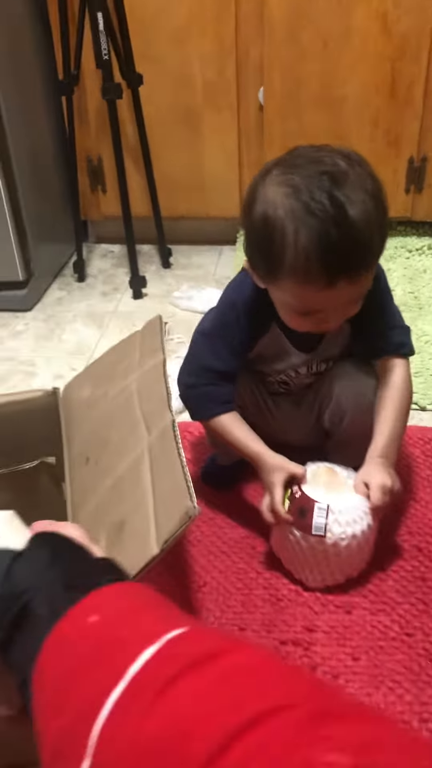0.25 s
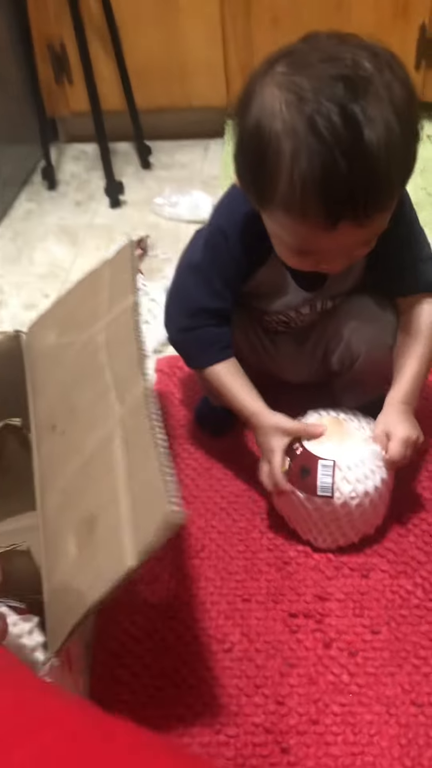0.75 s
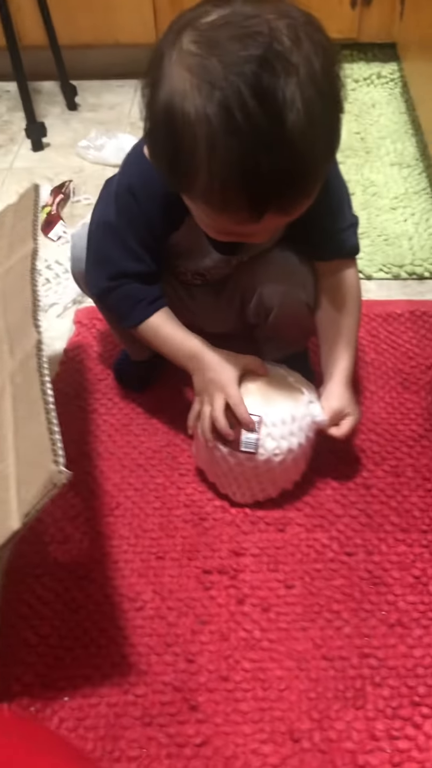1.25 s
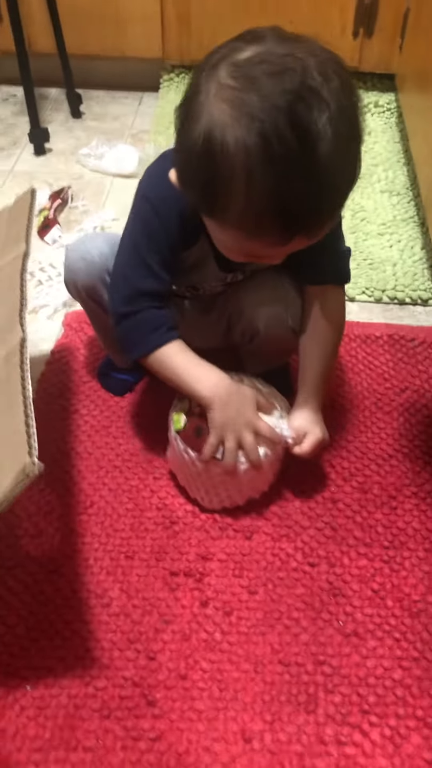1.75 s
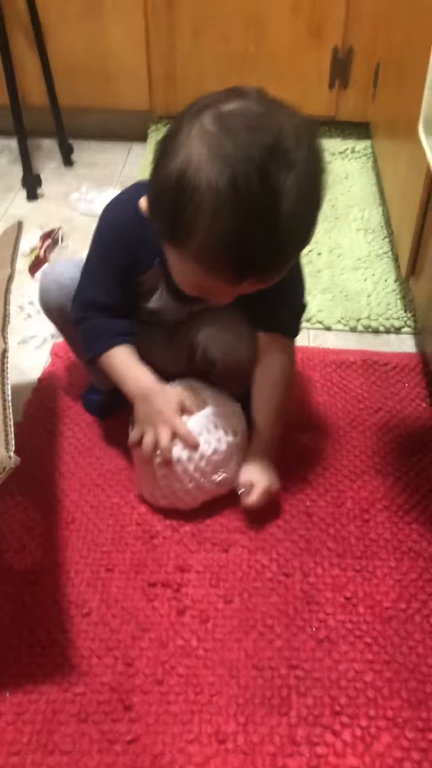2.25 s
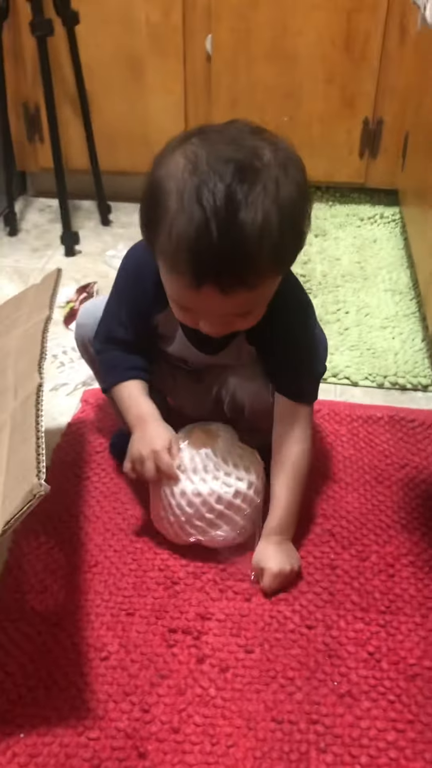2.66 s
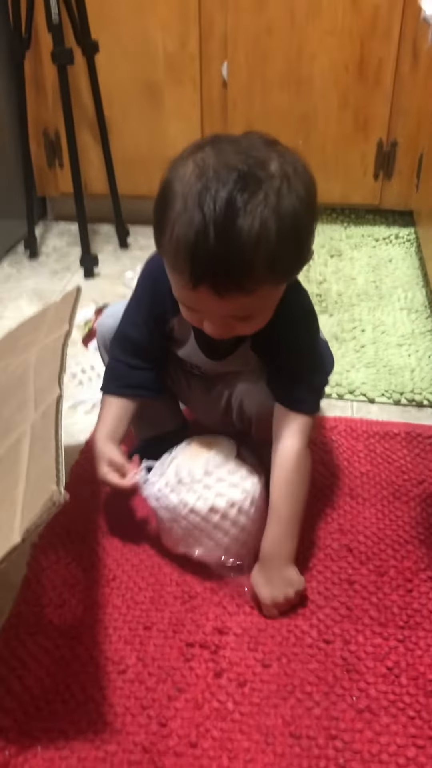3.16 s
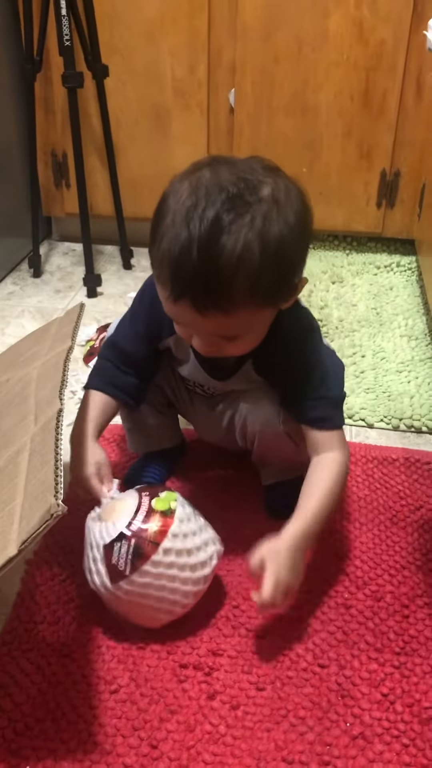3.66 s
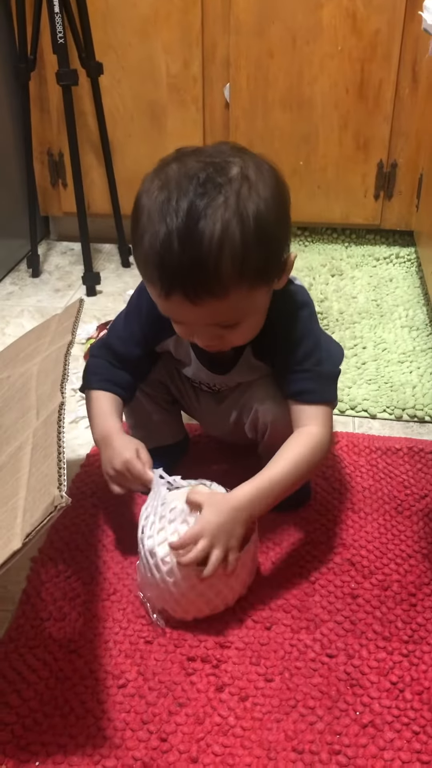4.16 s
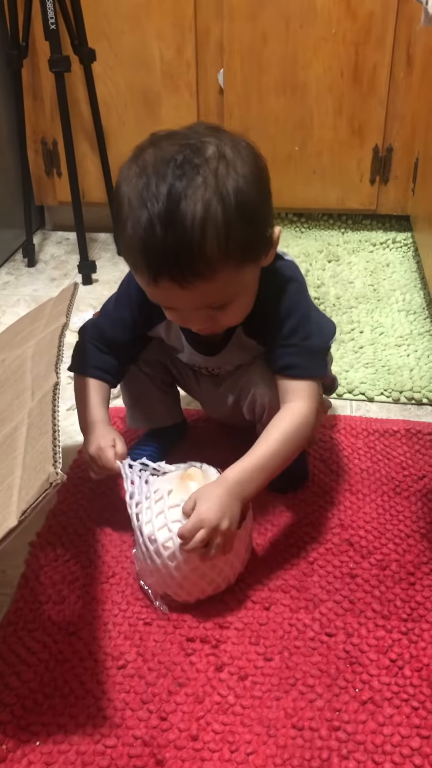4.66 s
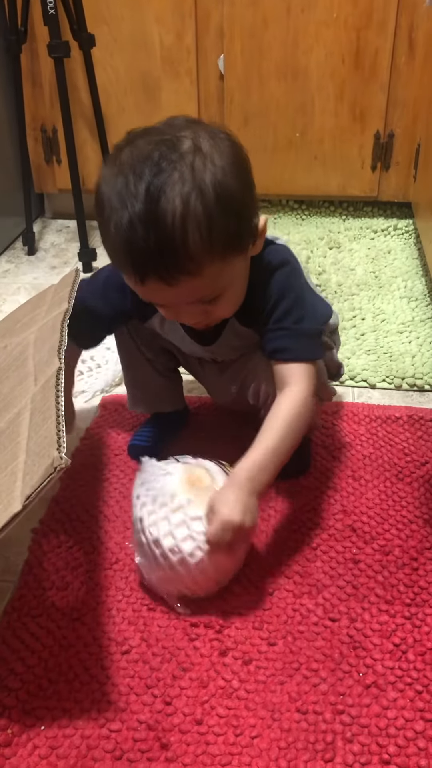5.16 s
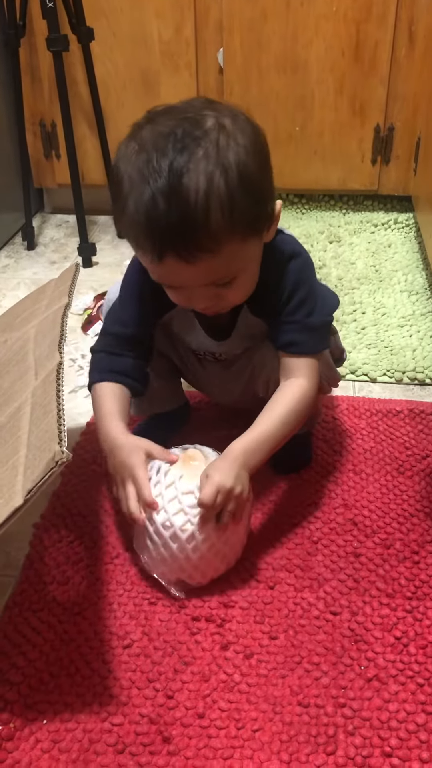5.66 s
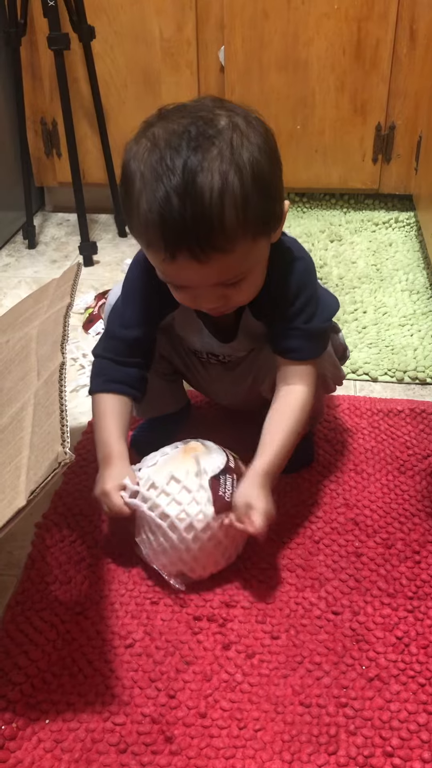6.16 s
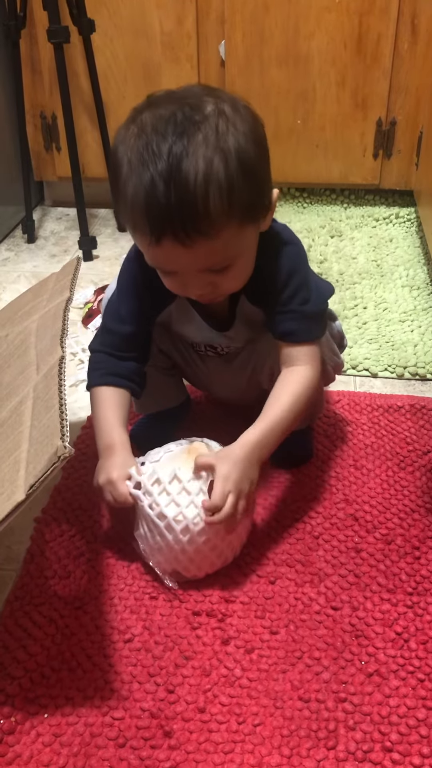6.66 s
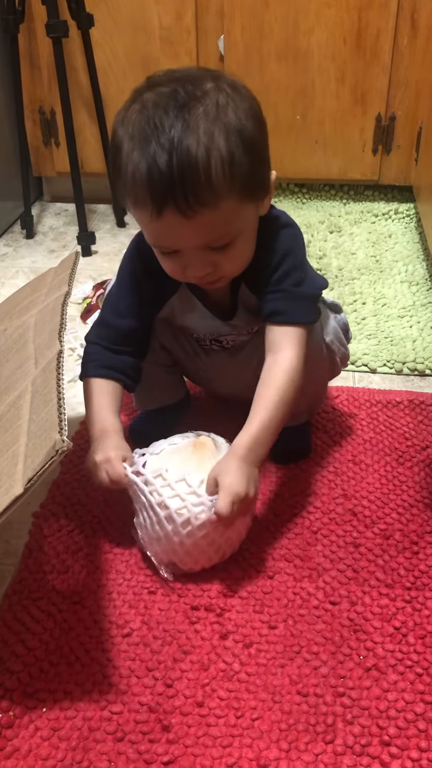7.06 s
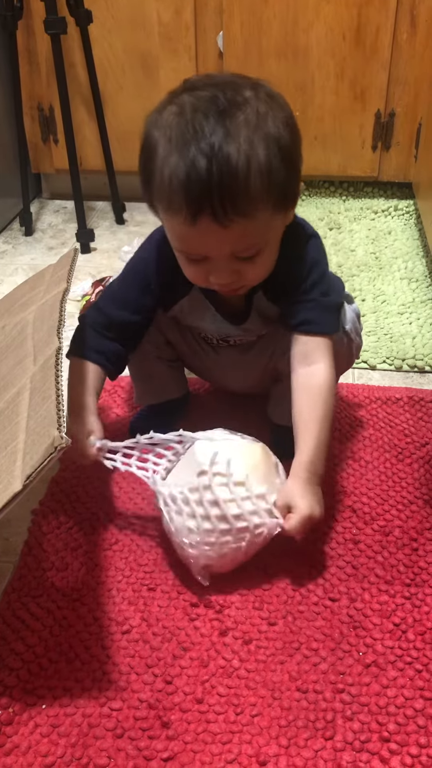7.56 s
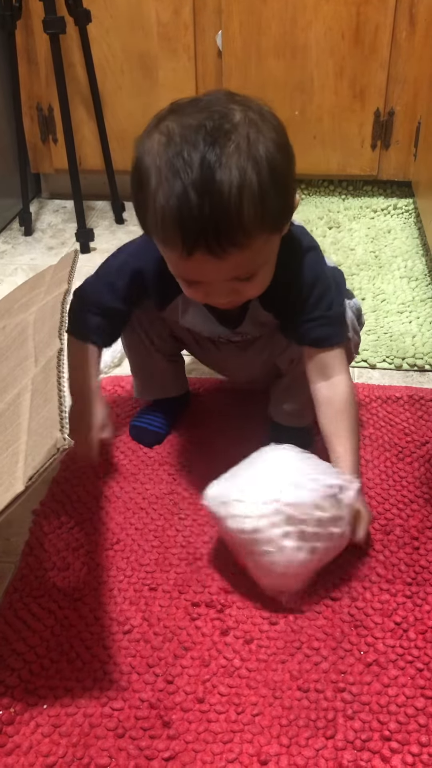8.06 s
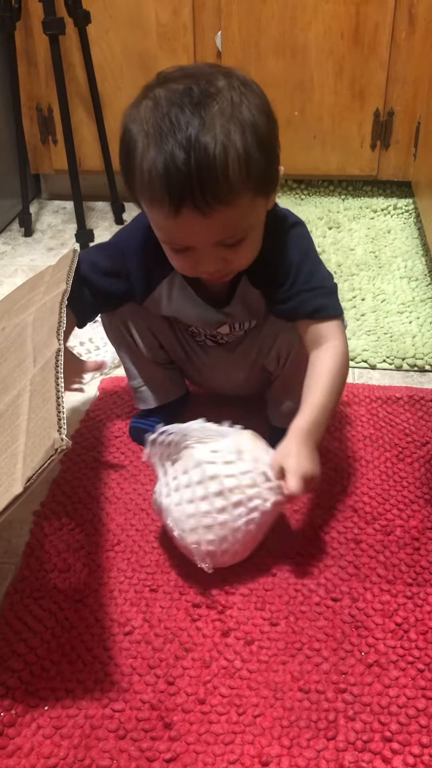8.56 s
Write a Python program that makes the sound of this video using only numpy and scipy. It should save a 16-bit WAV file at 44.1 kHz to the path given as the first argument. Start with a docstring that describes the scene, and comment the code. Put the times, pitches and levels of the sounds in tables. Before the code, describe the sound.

Small hands pull at a stretchy foam sleeve on a big fruit resting on a rug. Irregular dry snaps, light rustles and dull bumps come in clusters, with a long soft creaky crackle midway. Late on, several very loud tearing pops burst out, then only faint ticks remain. Close handheld microphone in a small, lightly reflective kitchen with quiet fridge hum and air hiss.

```python
"""On a kitchen rug, small hands pull at the foam mesh sleeve around a large fruit.
Strands snap as noise tears that ring resonators, crack in the treble and knock the fruit's modes; some creak.
Low thuds are noise through a low resonance, with a scuff; rubbed foam rustles in clumped ticks over coloured hiss.
A fridge hums as sine lines in coloured air noise, and decaying noise bands give the room's reflections."""
import sys
import numpy as np
from scipy import signal
from scipy.fft import rfft, irfft
from scipy.io import wavfile

SR = 44100
rng = np.random.default_rng(int(sys.argv[2]) if len(sys.argv) > 2 else 0)


def int16_out(signal):
    """Quantize to a 16-bit WAV file."""
    q = np.round(np.clip(np.atleast_2d(signal).T, -1, 1) * 32767)
    wavfile.write(sys.argv[1], SR, q.astype(np.int16))


N = 388080  # length in samples

# room air colour: f/Hz, relative density level/dB per Hz
AIR_SPECTRUM = [(15, -33.5), (25, -3), (64, 8), (309, 2.5), (354, -1), (416, -2.5), (887, -7.5),
                (1290, -12.5), (2990, -16), (5570, -18), (14800, -26.5), (16000, -40)]
AIR_DB = -67  # rms level around which the air drifts
# fridge motor lines: f/Hz, mean rms level/dB
FRIDGE_LINES = [(118.4, -83), (360.7, -78)]
# decay of the room's reflections: f/Hz, t60/s
ROOM_DECAY = [(100, 0.32), (300, 0.38), (1000, 0.2), (4000, 0.16), (12000, 0.068)]
ROOM_DB = -40  # gain on the reflections

# colour of the foam rustle: f/Hz, relative density level/dB per Hz
FOAM_SPECTRUM = [(600, -21), (1300, -19), (2050, -1.5), (2450, -3.5), (3300, -0.5), (4300, -6.5),
                 (5100, -3), (6500, -8), (9000, -11.5), (16000, -30)]
# where the mesh rings when rubbed or torn: f/Hz
SLEEVE_MODES = [1884, 2600, 3290, 3800, 4650, 6500, 8850]
# colour of the dull rubbing: f/Hz, relative density level/dB per Hz
DULL_RUB_SPECTRUM = [(65, -32), (110, -7), (345, -4), (422, -10), (668, -1), (1600, -13.5), (2080, -20.5),
                     (3520, -120)]
# each rub of foam on skin, fruit and rug: peak t/s, swell t/s, hold t/s,
# bright rustle level/dB, dull rub level/dB, treble level/dB relative to bright
RUB_STROKES = [(0.055, 0.017, 0.001, -54, -56.5, -3), (0.301, 0.022, .001, -57.5, -66, -3),
               (0.716, 0.012, .001, -43.5, -44.5, -15), (0.802, 0.017, .001, -51.5, -44, 0.5),
               (0.964, 0.025, 0.024, -58, -57, -2), (1.085, 0.027, .001, -51.5, -56.5, 6.5),
               (1.336, 0.021, .001, -68, -62.5, -8), (1.478, 0.11, 0.076, -58.5, -68.5, -5.5),
               (1.728, 0.037, 0.042, -58.5, -66, -1), (1.788, .03, 0.028, -64, -57, 4),
               (2.104, 0.2, .001, -46.5, -44, 6), (2.309, 0.1, 0.41, -63.5, -61, 3.5),
               (2.625, 0.32, 0.18, -61.5, -64, 7.5), (2.978, 0.17, 0.18, -59.5, -60, -2),
               (3.214, 0.045, 0.063, -60.5, -58.5, -1), (3.437, 0.044, 0.00084, -70, -74, 2),
               (3.891, 0.028, 0.013, -68.5, -77, -2), (4.14, 0.07, 0.36, -66, -76, -10),
               (4.61, 0.41, 0.25, -61, -70, 2.5), (4.914, 0.011, 0.04, -49.5, -48, 1),
               (5.05, 0.054, 0.022, -60.5, -89, 2.5), (5.787, 0.023, 0.038, -54.5, -65.5, -3),
               (6.004, 0.038, 0.034, -50, -54, 5.5), (6.082, 0.028, 0.044, -52.5, -57.5, -8),
               (6.408, 0.022, .001, -63.5, -80, -5), (6.73, 0.29, .001, -69.5, -72, 2),
               (7.069, 0.2, 0.024, -64, -64, 9.5), (7.217, 0.18, 0.025, -60.5, -63.5, 12),
               (7.332, 0.034, 0.091, -55, -41.5, 16), (7.43, 0.1, 0.00091, -38.5, -39, -11),
               (7.626, 0.0049, 0.00083, -63, -45.5, 15), (7.728, 0.016, 0.00091, -43.5, -36, 4.5),
               (7.824, 0.096, .001, -59, -54, -1), (7.972, .015, 0.011, -68, -64, 12),
               (8.121, .015, 0.029, -63.5, -67.5, 6), (8.427, 0.036, .001, -65, -76, -3)]
SWELL_DB, FADE_DB_PER_S, DULL_FADE_DB_PER_S = 27.5, 154, 175
# hands resting on the foam between rubs
REST_DB, REST_DULL_DB, REST_WANDER_DB = -79, -81, 3.5

# dull low thuds, some under loud snaps: t/s, peak level/dB before the common trim,
# resonance f/Hz, t60/s of the push, scuff level/dB relative to the push
LOW_THUDS = [(0.09, -43, 338, 0.18, -5), (0.159, -48.5, 73.4, 0.58, -4.5), (0.712, -28, 111, 0.31, -8),
             (0.73, -31.5, 102, 0.12, -9), (0.796, -18, 705, 0.048, -15.5), (0.975, -34, 180, 0.12, -11),
             (0.989, -30, 74, 0.14, -20), (1.913, -36, 284, 0.2, -1), (1.971, -34, 600, 0.063, 12),
             (2.008, -37.5, 221, 0.083, 3), (2.067, -26.5, 388, 0.055, 16), (2.103, -26, 185, 0.057, 6),
             (2.45, -43, 109, 0.25, -11), (2.485, -26.5, 89, 0.16, -1), (2.507, -31, 132, 0.19, -11),
             (3.202, -41, 613, 0.18, -7), (3.431, -46.5, 510, 0.056, -6), (3.9, -54, 90, 0.098, -3),
             (4.154, -44.5, 460, 0.18, -3), (4.912, -23.5, 294, 0.059, -0.5),
             (4.949, -21.5, 305, 0.048, -4.5), (6.005, -31, 248, 0.12, 0.5), (6.081, -29.5, 202, 0.17, 0),
             (6.434, -52.5, 80, 0.071, -21), (6.704, -41.5, 660, 0.1, -11), (7.299, -30.5, 613, 0.096, 1),
             (7.715, -16, 310, 0.06, 5), (7.784, -21, 420, 0.071, -7.5), (7.81, -24, 133, 0.21, 3),
             (7.832, -30.5, 302, 0.15, -4)]

# strands under steady pull, slip after slip: start t/s, end t/s, typical gap t/s,
# central ring peak level/dB, central ring f/Hz, central crack peak level/dB (levels before the common trims)
STRAND_CREAKS = [(1.955, 2.14, .014, -50, 3640, -45.5), (2.43, 2.83, 0.009, -52.5, 3900, -54),
                 (2.97, 3.32, .013, -55, 3340, -54), (4.629, 4.897, .0055, -47.5, 3550, -54.5),
                 (5.784, 5.881, .014, -60, 3340, -56.5), (7.04, 7.26, .016, -51, 3368, -51)]
# random spreads: log gap, shared level, extra crack level, fraction of the pitch
SLIP_GAP_SPREAD, SLIP_SPREAD_DB, SLIP_CRACK_SPREAD_DB, SLIP_PITCH_SPREAD = 0.4, 3, 4, 0.13
# strands slipping and breaking: t/s, ring peak level/dB, ring f/Hz, crack peak level/dB (before the common trims)
STRAND_SNAPS = [(0.057, -28, 3800, -40), (0.297, -40, 3300, -44.5), (0.7145, -32.5, 3150, -53),
                (0.769, -18.5, 3300, -34), (0.7965, -36, 1770, -41.5), (0.812, -37, 5060, -47),
                (0.9648, -38.5, 2200, -42), (0.99, -41.5, 3420, -45.5), (1.0481, -27.5, 4100, -32.5),
                (1.0821, -27.5, 3620, -30.5), (1.095, -33.5, 3470, -53), (1.117, -35, 3200, -41),
                (1.341, -32, 3600, -48), (1.3545, -43, 3470, -53.1), (1.4786, -59, 3520, -54),
                (1.4995, -46, 4740, -57), (1.972, -37, 3120, -42), (2.0093, -26.5, 3500, -41),
                (2.0337, -30, 4220, -38), (2.0386, -19.5, 3230, -33), (2.066, -26, 3750, -31),
                (2.068, -31, 2600, -27), (2.072, -34, 2200, -31), (2.1013, -37, 4200, -32),
                (2.1031, -28, 2900, -28), (2.1072, -35, 4400, -27), (2.1093, -34, 4530, -25),
                (2.1205, -32.5, 3900, -37), (2.1245, -34.5, 2580, -32), (2.2878, -41, 3670, -53),
                (2.5154, -27, 5340, -32), (2.606, -32.5, 4120, -43), (2.669, -31, 3800, -43),
                (2.694, -40, 3930, -45), (2.9224, -37.5, 3200, -41.5), (2.9765, -39, 4080, -42),
                (3.0958, -37, 4070, -43), (3.1428, -47, 3340, -45.5), (3.2005, -31.5, 2760, -34.5),
                (3.2042, -28.5, 3720, -35), (3.2135, -32.5, 3180, -40), (3.273, -38, 3050, -40.5),
                (3.431, -54.5, 2930, -50), (3.8994, -38.5, 2800, -53), (3.9778, -48, 3300, -50),
                (4.128, -48, 4420, -48), (4.161, -45, 2860, -44), (4.2284, -36, 3100, -48),
                (4.348, -42.5, 3300, -54), (4.4068, -49, 3000, -51), (4.424, -47, 3220, -53),
                (4.4434, -42, 3450, -51), (4.4888, -53, 4240, -50), (4.5154, -44, 3170, -50),
                (4.5543, -37.5, 2950, -44), (4.582, -31.5, 3060, -45), (4.597, -30, 3200, -49),
                (4.61, -29, 3250, -47), (4.6182, -32.5, 3370, -58), (4.6283, -38, 3480, -62),
                (4.639, -42, 3300, -54), (4.6596, -35, 3470, -44), (4.6815, -44, 3800, -51),
                (4.691, -40, 3500, -50), (4.6997, -37, 3680, -50), (4.7099, -48, 3500, -50),
                (4.7248, -41, 3300, -49), (4.7403, -37, 2900, -50), (4.7524, -45, 3500, -48),
                (4.7655, -44, 3800, -38), (4.7798, -36, 2930, -44), (4.792, -41, 3300, -52),
                (4.8076, -35, 3460, -40), (4.8197, -36, 3350, -44), (4.829, -34, 3300, -47),
                (4.8361, -37, 3290, -44), (4.844, -35, 3000, -47), (4.868, -43, 3300, -50),
                (4.8901, -42, 3190, -50), (4.9137, -34, 1500, -40), (4.951, -25, 3010, -32.5),
                (4.9553, -23.5, 2940, -42), (5.0402, -38.5, 3400, -64), (5.0559, -30, 3800, -36.5),
                (5.2985, -49, 2800, -59), (5.608, -48, 3280, -55), (5.817, -35, 5100, -44.5),
                (5.8417, -47, 3600, -59), (5.8524, -30.5, 3260, -50), (5.8692, -41.5, 3200, -51),
                (5.952, -41, 3400, -53), (5.973, -37.5, 3700, -51), (6.0049, -29, 3040, -27.5),
                (6.0078, -24.5, 4020, -29.5), (6.044, -29, 2870, -37), (6.0789, -19, 3030, -33.5),
                (6.0806, -17.5, 4340, -37), (6.0838, -31.5, 2000, -32.5), (6.2184, -53, 3450, -52),
                (6.416, -42.5, 3630, -51), (6.5789, -52.5, 2100, -55), (6.707, -46, 2900, -55),
                (6.725, -44.5, 3200, -51), (6.8294, -47.5, 3100, -55), (7.0687, -40.5, 2850, -39.5),
                (7.0932, -53, 4270, -39), (7.1811, -39, 3520, -44.5), (7.2079, -35.5, 3290, -41),
                (7.2998, -30, 2190, -31), (7.3254, -10, 2830, -24), (7.3482, -36, 2740, -37),
                (7.362, -10, 2600, -24), (7.372, -29, 2200, -36), (7.3763, -22, 4080, -25),
                (7.4015, -9.5, 2700, -17.5), (7.4287, -8.5, 2980, -16.5), (7.4404, -12.5, 3000, -23.5),
                (7.4809, -36, 4000, -33), (7.6267, -17.5, 2920, -34), (7.713, -7.5, 2640, -21.5),
                (7.7196, -10, 2500, -20), (7.7828, -30.5, 3060, -39), (7.836, -34, 4470, -40),
                (7.966, -41.5, 5470, -47), (7.9745, -51, 3200, -47), (8.0309, -49, 3360, -62),
                (8.1167, -35.5, 3220, -46), (8.127, -35.5, 3200, -47), (8.14, -38, 3140, -56),
                (8.3, -48, 5700, -57.5), (8.423, -39, 3000, -45), (8.4305, -46, 3000, -53),
                (8.5074, -54.5, 1970, -74), (8.6038, -52, 4170, -66)]
# modes of the jolted fruit: f/Hz, relative level/dB, t60/s
FRUIT_MODES = [(190, -11.5, 0.053), (310, -6.5, 0.071), (490, 0, 0.01), (606, -13.5, 0.095),
               (910, 2.5, 0.011), (1500, 7.5, 0.00046)]

CUTOFF_HZ = 17100


def from_db(db):
    """Decibels to gain."""
    return 10 ** (np.asarray(db) / 20)


def rms_one(x):
    """Scaled to rms 1."""
    return x / np.sqrt(np.mean(x ** 2) + 1e-20)


def at_hz(points, hz):
    """A table read on a log-frequency axis."""
    table_hz, values = np.array(points).T
    return np.interp(np.log(hz), np.log(table_hz), values)


def coloured(x, spectrum):
    """Filtered by a spectrum in dB per Hz; rms 1."""
    hz = np.fft.rfftfreq(len(x), 1 / SR) + 1
    return rms_one(irfft(rfft(x) * from_db(at_hz(spectrum, hz)), len(x)))


def drift(rate):
    """Slow chance: straight lines between random points of spread 1, `rate` points a second."""
    knots = np.arange(0, N + SR, SR / rate)
    return np.interp(np.arange(N), knots, rng.standard_normal(len(knots)))


def add(out, s, sound):
    """Lays a short sound in at s seconds."""
    at = round(s * SR)
    out[at:at + len(sound)] += sound[:N - at]


def filtered(x, order, hz, kind):
    """A Butterworth high-pass or band-pass."""
    return signal.sosfilt(signal.butter(order, hz, kind, fs=SR, output="sos"), x)


def ring(force, hz, t60):
    """A damped resonator: a unit click sets a decaying sine of height 1 ringing."""
    r, w = from_db(-60 / (t60 * SR)), 2 * np.pi * hz / SR
    return signal.lfilter([0, np.sin(w)], [1, -2 * r * np.cos(w), r * r], force + 1e-18)


def burst(noise, rise_s, t60):
    """Noise that swells fast and dies away."""
    t = np.arange(len(noise)) / SR
    return noise * (1 - np.exp(-t / rise_s)) * from_db(-60 * t / t60)


def quiet_room():
    """Nearly steady coloured hiss of the air, with the fridge motor's gently wavering lines."""
    t = np.arange(N) / SR
    air = from_db(AIR_DB + 0.57 * drift(7.9)) * coloured(rng.standard_normal(N), AIR_SPECTRUM)
    hum = np.zeros(N)
    for hz, db in FRIDGE_LINES:
        hum += np.sqrt(2) * from_db(db + 2.0 * drift(12)) * np.sin(2 * np.pi * hz * t)
    return air + hum


def kitchen(x, gap_s):
    """Dense reflections: half-octave bands of noise, each dying at its own rate."""
    t = np.arange(SR // 2) / SR
    edges = 45 * 2 ** np.arange(0, 9, 0.5)
    white, echo = rng.standard_normal((2, len(t))), np.zeros(len(t))
    for k, (low, high) in enumerate(zip(edges, edges[1:])):
        # neighbouring bands take turns with two noises
        band = filtered(white[k % 2], 2, [low, high], "band")
        echo += band * from_db(-60 * t / at_hz(ROOM_DECAY, np.sqrt(low * high)))
    # the reflections build up just after the direct sound
    echo = echo * (1 - np.exp(-t / gap_s))
    return signal.fftconvolve(x, echo)[:N]


def rub_gains():
    """Bright, treble and dull gains: each rub swells, holds and fades; powers add to the resting level."""
    t = np.arange(0, N, 32) / SR
    s, swell, hold, bright_db, dull_db, treble_db = np.transpose(RUB_STROKES)[:, :, None]
    rise_db = SWELL_DB * np.minimum(t - s, 0) / np.maximum(swell, 0.003)
    after = np.maximum(t - s - np.maximum(hold, 0), 0)
    bright_db = bright_db + rise_db - FADE_DB_PER_S * after
    dull_db = dull_db + rise_db - DULL_FADE_DB_PER_S * after
    wander_db = REST_WANDER_DB * drift(7)
    gains = []
    for db, rest_db in [(bright_db, REST_DB), (bright_db + treble_db, REST_DB), (dull_db, REST_DULL_DB)]:
        strokes = np.sqrt(np.sum(from_db(db) ** 2, axis=0))
        strokes = np.interp(np.arange(N) / SR, t, strokes)
        gains.append(np.hypot(strokes, from_db(rest_db + wander_db)))
    return gains


def rustle(per_s, spread_db, hiss, clump_db, ticks, sleeve, patchy_db):
    """Tiny cell walls stick and slip in clumps over mesh-coloured hiss; rubbing on the rug adds a dull part."""
    bright, treble, dull = rub_gains()
    sizes = from_db(spread_db * np.minimum(rng.exponential(1, N), 4)) * rng.choice([-1, 1], N)
    slips = sizes * (rng.random(N) < per_s * from_db(clump_db * drift(40)) / SR)

    # each slip is a broad tick and rings one cell of its own size
    pitches, dealt = np.geomspace(1300, 14000, 14), rng.integers(0, 14, N)
    cells = np.zeros(N)
    for k, hz in enumerate(pitches):
        cell_gain = from_db(at_hz(FOAM_SPECTRUM, hz)) * np.sqrt(hz)
        cells += cell_gain * ring(slips * (dealt == k), hz, 15.0 / hz)
    foam = rms_one(cells) + ticks * coloured(slips, FOAM_SPECTRUM)

    # the mesh colours the hiss in shifting patches
    rings = np.zeros(N)
    for hz in SLEEVE_MODES:
        patch = from_db(at_hz(FOAM_SPECTRUM, hz) + patchy_db * drift(9))
        rings += patch * rms_one(ring(rng.standard_normal(N), hz, 20.0 / hz))
    sheen = coloured(rng.standard_normal(N), FOAM_SPECTRUM) + sleeve * rms_one(rings)
    foam = rms_one(foam + hiss * sheen * from_db(5.1 * drift(110)))

    # split near 5 kHz so the treble follows its own gain
    body = signal.sosfiltfilt(signal.butter(1, 5000, fs=SR, output="sos"), foam)
    rub = coloured(rng.standard_normal(N), DULL_RUB_SPECTRUM) * from_db(1.9 * drift(35))
    return bright * body + treble * (foam - body) + dull * rub


def low_thuds(level_db, scuff_length):
    """A soft, uneven push shakes a broad low resonance; a rough scuff spreads around and above it."""
    out, noise = np.zeros(N), rng.standard_normal((len(LOW_THUDS), 2, SR // 3))
    for k, (s, peak_db, hz, t60, scuff_db) in enumerate(LOW_THUDS):
        broad = 3.6 / hz  # short ring, so a wide resonance
        push = burst(noise[k, 0], 0.099 / hz, t60)
        push = ring(ring(push, hz, broad), hz, broad)
        push = filtered(push, 2, 0.46 * hz, "high")
        scuff = burst(noise[k, 1], 0.00082, scuff_length * t60)
        scuff = filtered(scuff, 2, [0.7 * hz, 2.4 * hz], "band")
        both = rms_one(push) + from_db(scuff_db) * rms_one(scuff)
        add(out, s, from_db(peak_db + level_db) * both / np.abs(both).max())
    return out


def creak():
    """Stretched strands stick and slip at uneven gaps around a typical one; returns rows like the snaps."""
    rows = []
    for start, end, gap_s, peak_db, hz, crack_db in STRAND_CREAKS:
        gap, size, pitch, crack = rng.standard_normal((60, 4)).T
        s = start + np.cumsum(gap_s * np.exp(SLIP_GAP_SPREAD * gap))
        size_db = SLIP_SPREAD_DB * size
        slip_hz = hz * (1 + SLIP_PITCH_SPREAD * pitch)
        slip_crack_db = crack_db + size_db + SLIP_CRACK_SPREAD_DB * crack
        slips = np.transpose([s, peak_db + size_db, slip_hz, slip_crack_db])
        rows += list(slips[s < end])
    return rows


def snaps(ring_db, crack_db, knock_db, knock_growth, cycles, damping, overtone, overtone_db, mesh_db, mesh_t60):
    """Each break is a brief tear that rings the strand a few cycles, cracks in the treble and jolts the fruit."""
    breaks = STRAND_SNAPS + creak()
    out, jolts = np.zeros(N), np.zeros((len(FRUIT_MODES), N))
    noise = rng.standard_normal((len(breaks), 2, 700))
    # the first fibre to part gives a sharp edge
    noise[:, :, 8] += [[8.8, 4.0]]
    share_db = rng.normal(0, 2, (len(breaks), len(FRUIT_MODES)))  # uneven jolt per mode
    for k, (s, peak_db, hz, high_db) in enumerate(breaks):
        # thick strands are louder, part more slowly and ring less cleanly
        tear = 0.008 * from_db(0.15 * peak_db)
        t60 = cycles * from_db(-damping * peak_db) / hz
        strand = burst(noise[k, 0], 0.00033, tear)
        strand = ring(ring(strand, hz, t60), hz, t60)
        strand = filtered(strand, 1, 0.79 * hz, "high")
        crack = filtered(burst(noise[k, 1], 0.000096, 1.4 * tear), 2, [4300, 9500], "band")
        # the crack leans on an overtone of the strand
        upper = ring(crack, overtone * hz, 2.2 * t60)
        crack = rms_one(crack) + from_db(overtone_db) * rms_one(upper)
        add(out, s, from_db(peak_db + ring_db) * strand / np.abs(strand).max())
        add(out, s, from_db(high_db + crack_db) * crack / np.abs(crack).max())
        jolts[:, round(s * SR)] = from_db(knock_growth * peak_db + knock_db + share_db[k])

    # the jolt travels slowly through foam and rind: low modes speak later
    knock = np.zeros(N)
    for jolt, (hz, level_db, t60) in zip(jolts, FRUIT_MODES):
        knock += from_db(level_db) * np.roll(ring(jolt, hz, t60), round(1.296 / hz * SR))
    # the mesh rings on, other parts of it from break to break
    mesh = sum(ring(out * from_db(mesh_db + 5 * drift(12)), hz, mesh_t60) for hz in SLEEVE_MODES)
    return out + mesh + filtered(knock, 2, 170, "high")


def scene():
    """Everything near the hands, its reflections and the quiet room."""
    near = rustle(per_s=900, spread_db=5.5, hiss=0.96, clump_db=5.0, ticks=0.92, sleeve=1.33, patchy_db=5.5)
    near = near + low_thuds(level_db=-1.5, scuff_length=0.58)
    near = near + snaps(ring_db=1.0, crack_db=4.5, knock_db=-9.0, knock_growth=1.54, cycles=2.16, damping=0.21,
                        overtone=2.242, overtone_db=-6.0, mesh_db=-48, mesh_t60=0.063)
    reflections = from_db(ROOM_DB) * kitchen(near, gap_s=0.00095)
    return (quiet_room() + reflections + near)[None]


def record(dry):
    """The lowest bass rolls off and the top is steeply cut, 70 dB down from the cutoff up."""
    dry = filtered(dry, 2, 45, "high")
    return signal.sosfilt(signal.cheby2(12, 70, CUTOFF_HZ, fs=SR, output="sos"), dry)


dry = scene()
out = record(dry)
int16_out(out)
```